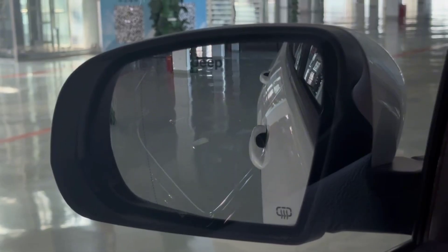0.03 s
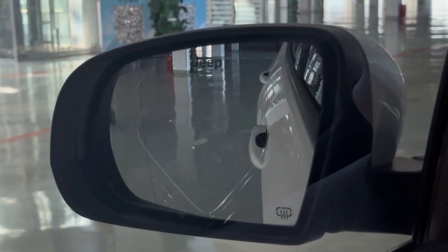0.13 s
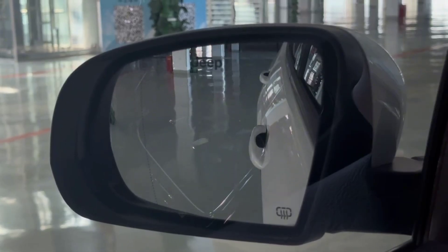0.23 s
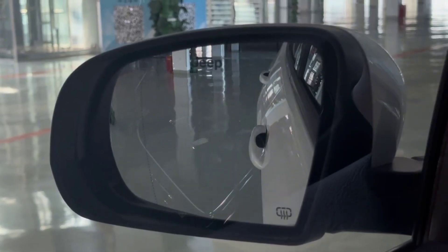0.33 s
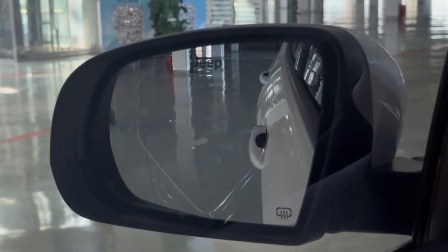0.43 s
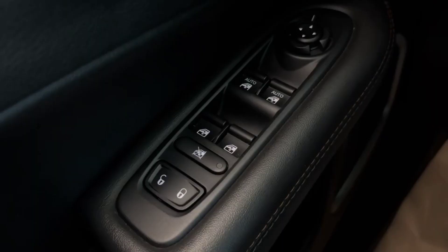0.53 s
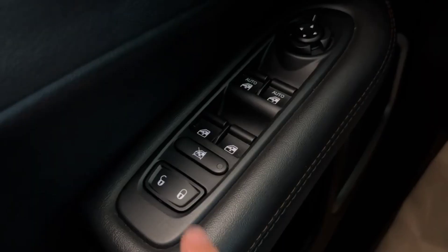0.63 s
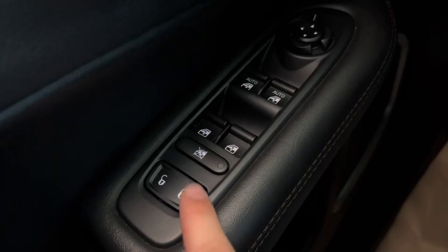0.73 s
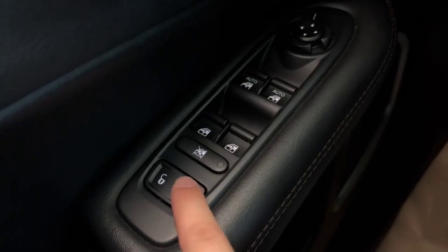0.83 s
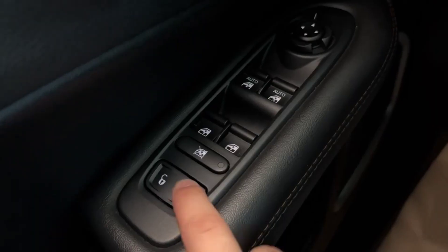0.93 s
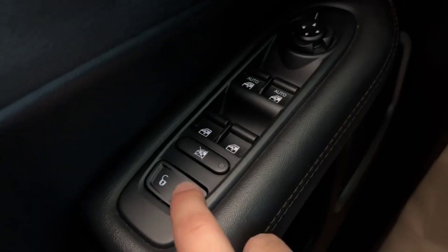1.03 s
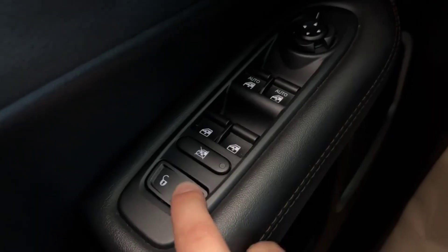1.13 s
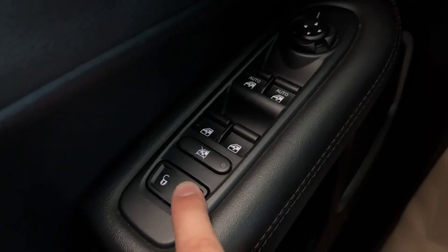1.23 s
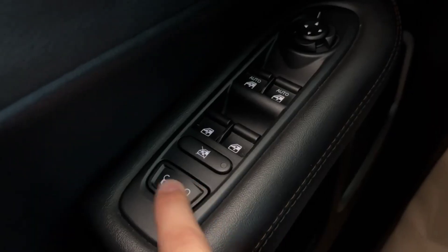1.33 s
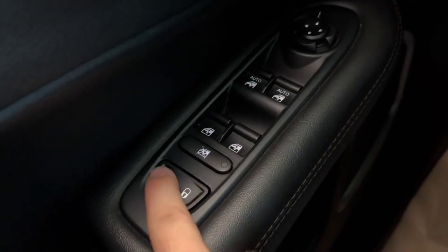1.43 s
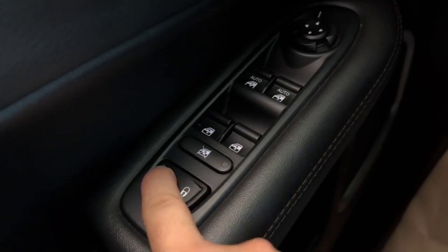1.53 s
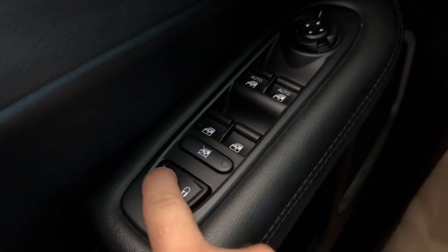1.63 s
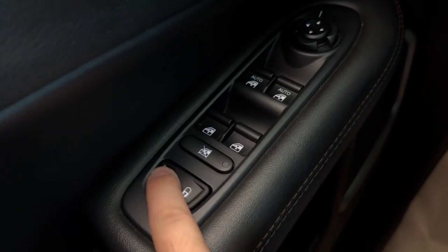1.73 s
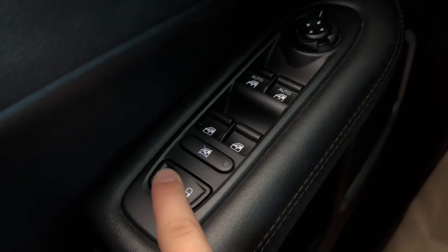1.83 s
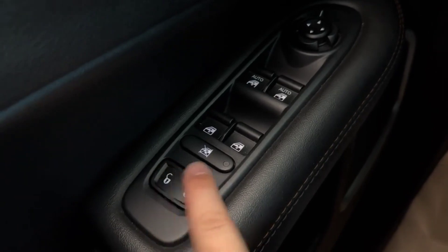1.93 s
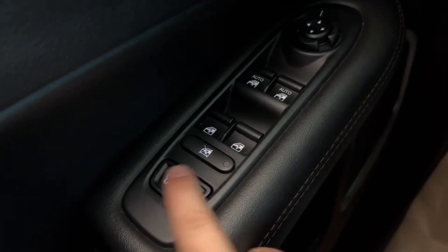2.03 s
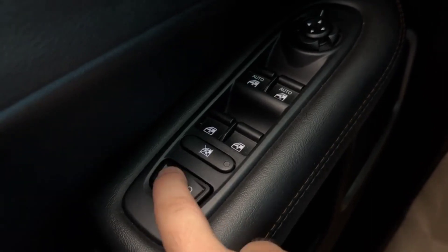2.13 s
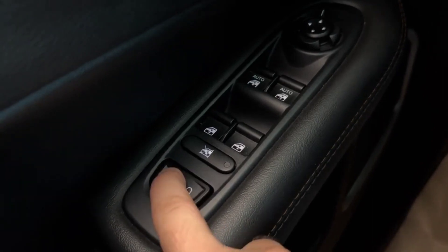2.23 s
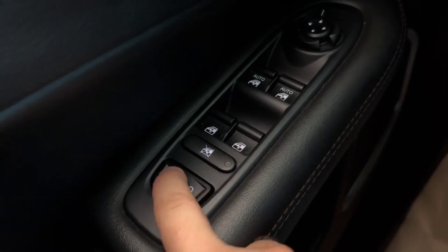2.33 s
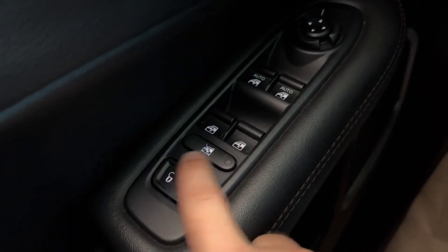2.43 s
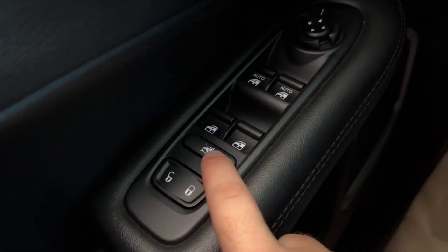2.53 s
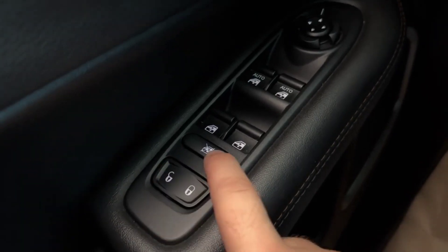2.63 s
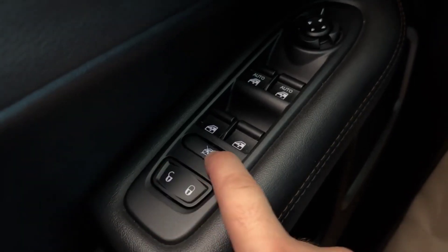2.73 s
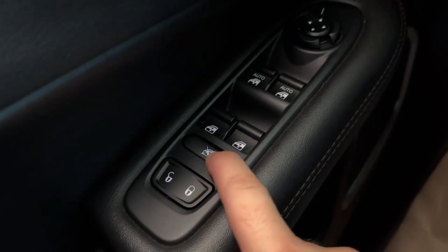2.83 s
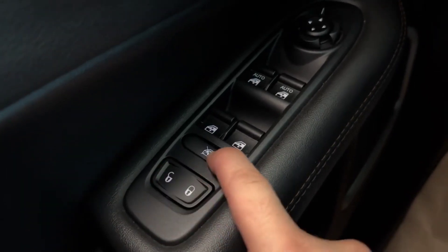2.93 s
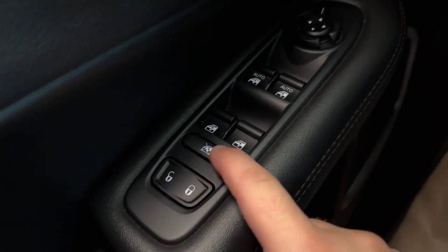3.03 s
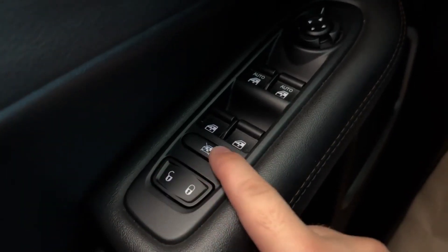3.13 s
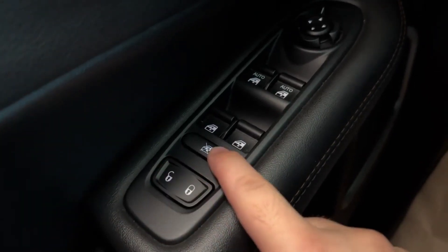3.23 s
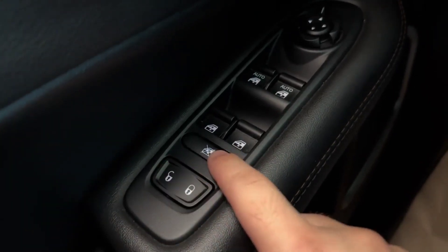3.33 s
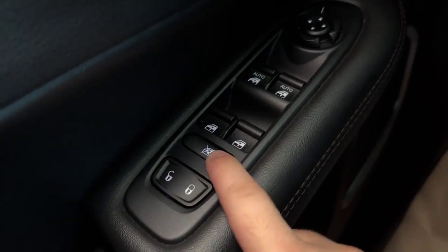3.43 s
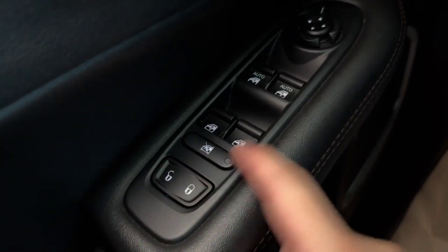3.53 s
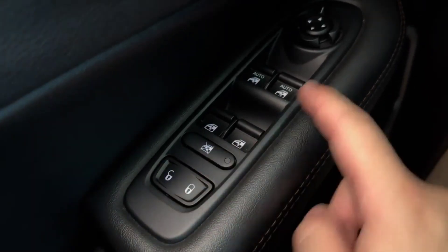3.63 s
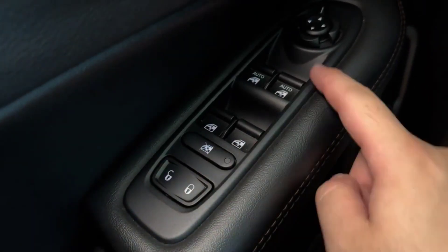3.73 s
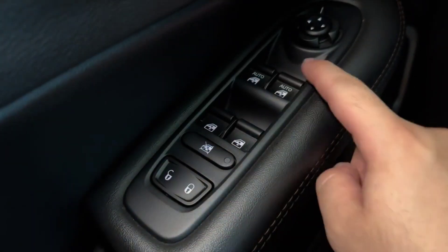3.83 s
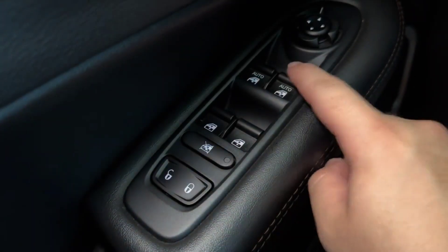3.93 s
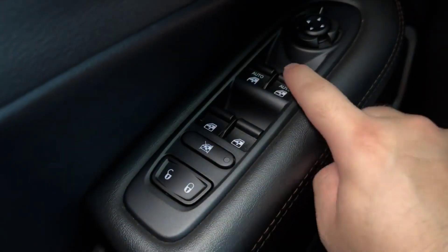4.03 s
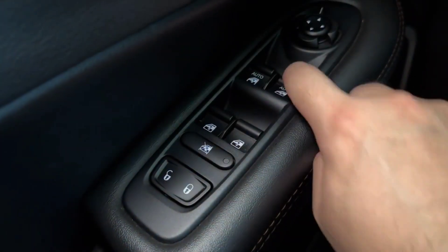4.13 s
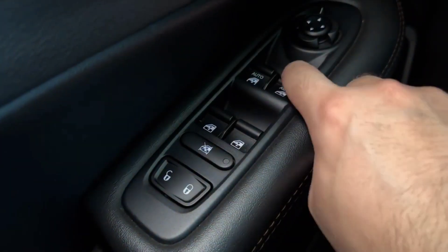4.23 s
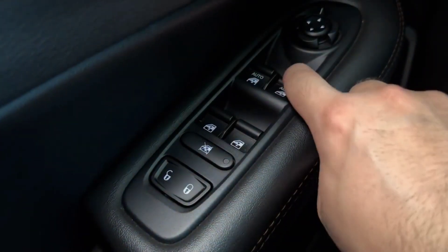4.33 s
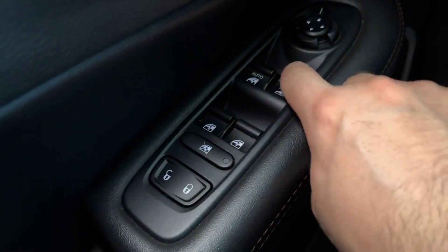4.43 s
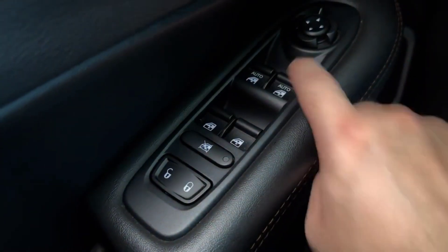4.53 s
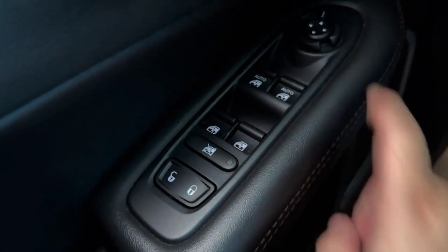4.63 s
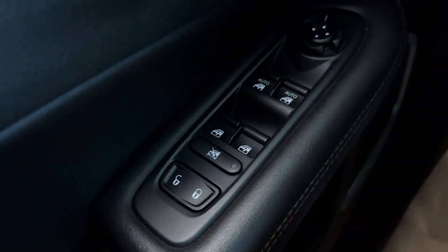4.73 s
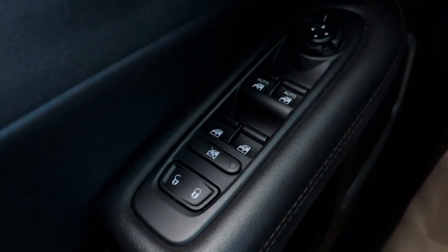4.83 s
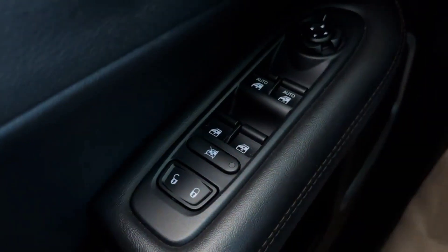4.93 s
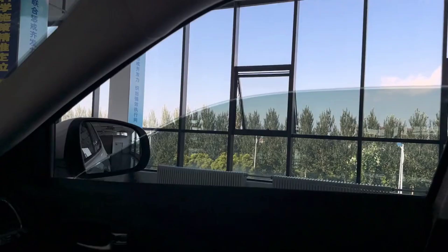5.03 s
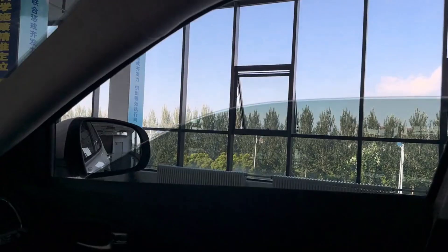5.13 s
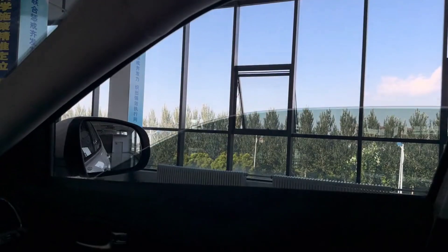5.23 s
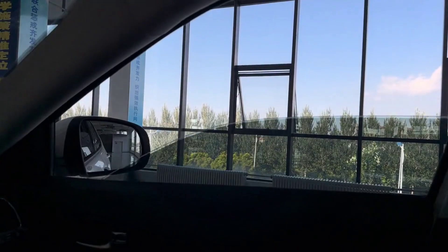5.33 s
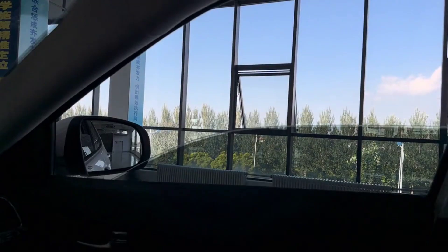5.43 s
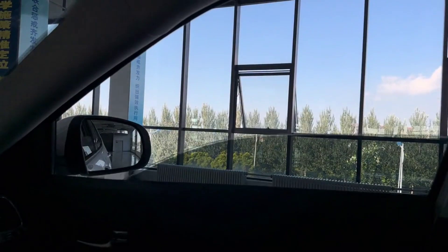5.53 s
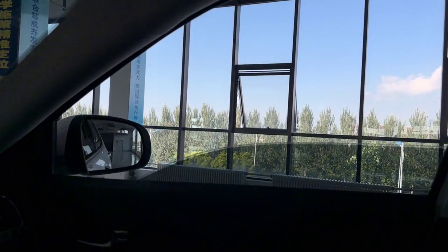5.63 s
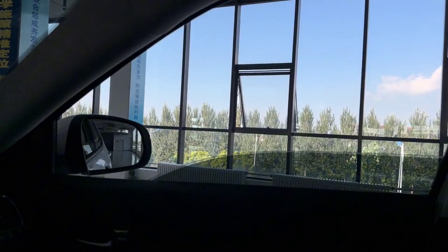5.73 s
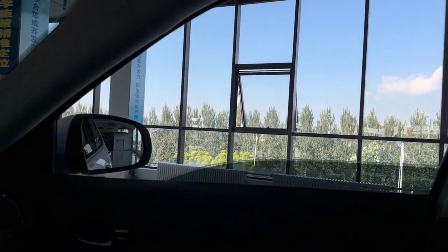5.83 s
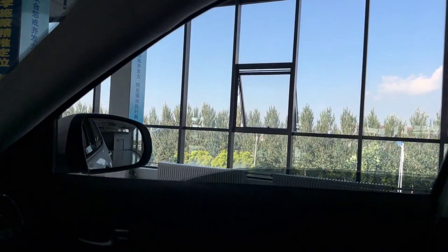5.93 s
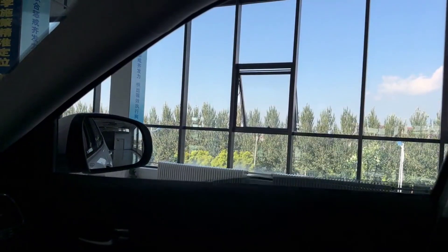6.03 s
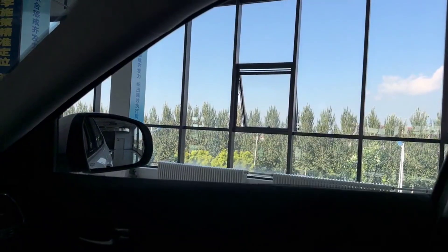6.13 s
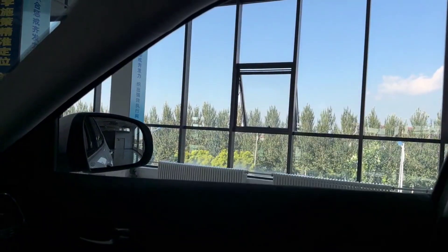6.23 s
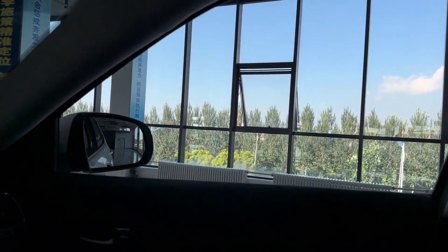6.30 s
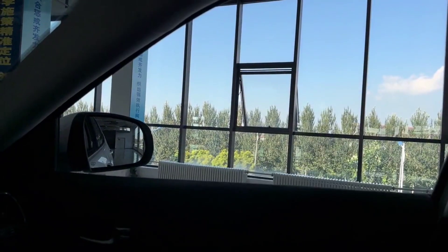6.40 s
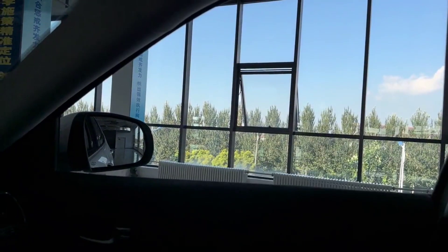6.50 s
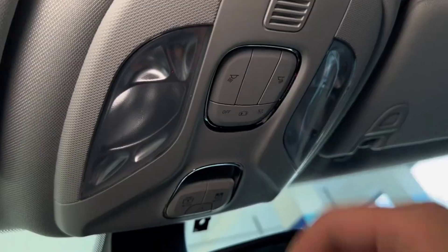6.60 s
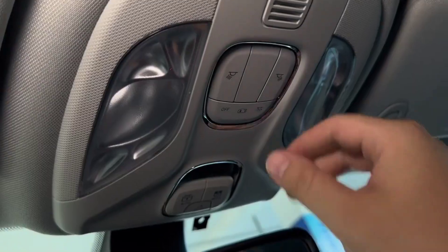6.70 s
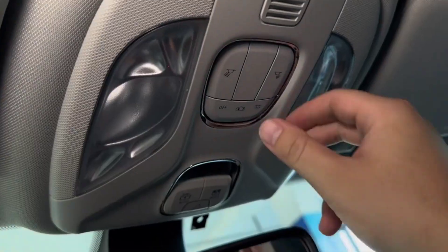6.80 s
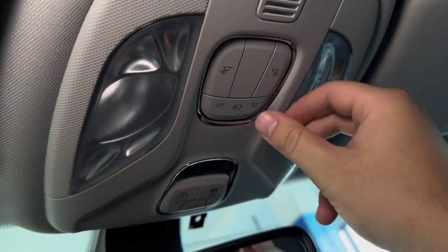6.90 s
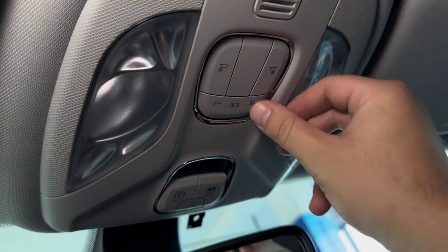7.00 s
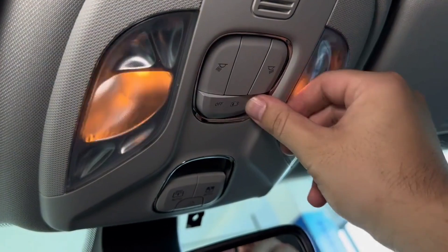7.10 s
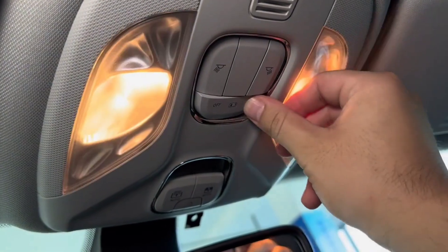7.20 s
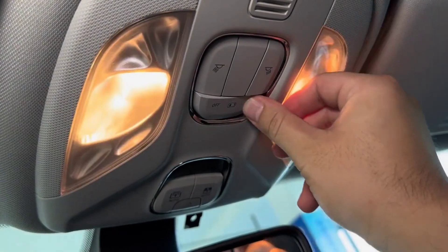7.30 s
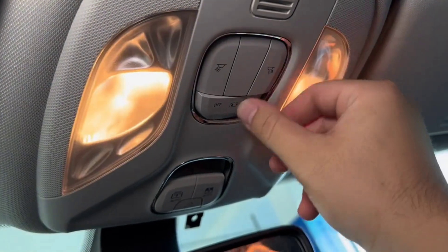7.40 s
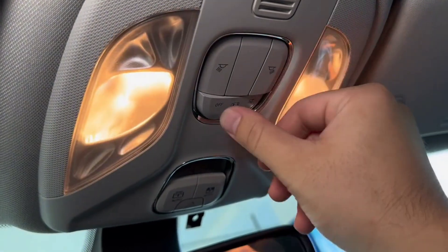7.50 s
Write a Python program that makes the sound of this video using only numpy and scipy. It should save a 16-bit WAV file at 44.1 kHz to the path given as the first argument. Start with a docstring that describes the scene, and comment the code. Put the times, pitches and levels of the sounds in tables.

```python
"""Plastic switches click under a rubbing fingertip inside a parked car, and twice the lock motors whirr
and the door latches slam. A lockout button clicks in and out, a motor lowers a window through its seals
to the end stop, and a roof lamp is clicked on, all over the dull noise of a hall outside.
Each impact is a short crack, the damped modes of the struck part, and a cabin reverberation whose bass
builds late and lingers. The fingertip sounds by stick-slip, the window by shaft harmonics and friction."""
import sys
import numpy as np
from scipy import signal
from scipy.fft import rfft, irfft, next_fast_len
from scipy.io import wavfile
from scipy.ndimage import uniform_filter1d

SR = 44100
rng = np.random.default_rng(int(sys.argv[2]) if len(sys.argv) > 2 else 0)


def wrap_up_sound(samples):
    """Save the sound to the file named by the first command line argument, as 16-bit audio."""
    columns = np.atleast_2d(samples).T
    # keep every value between -1 and 1, then stretch to whole-number steps
    tamed = np.clip(columns, -1, 1)
    steps = np.round(tamed * 32767).astype(np.int16)
    wavfile.write(sys.argv[1], SR, steps)


N = 333396
TIME = np.arange(N) / SR

# Each entry: start of a run of the lock motors in seconds.
LOCK_RUNS = [1.022, 2.205]
# Low, middle and high noise at the window. Each row: frequency in Hz, relative level in dB.
RUMBLE_SPECTRUM = [(30, -21), (55, -2.5), (125, 6), (160, -9), (220, -2.5), (350, -8), (500, -14),
                   (700, -19.5)]
SCRAPE_SPECTRUM = [(350, -9), (550, -12), (900, 3.5), (1200, -3), (1700, -0.5), (2400, -10), (3200, -12)]
HISS_SPECTRUM = [(1800, 4.5), (2700, 6), (3600, 3), (4500, 6.5), (6000, 3.5), (7800, 2.5), (9000, -7.5),
                 (11000, 1), (13000, -14), (15500, -11)]


def latches(thump_db=-20):
    """Impact excitation: the latches of all the doors slam in a cluster, each with the same thump."""
    # Each row: start in seconds, snap in dB, hardness in dB.
    slams = [(1.074, -23, -3.5), (1.078, -19.5, -7), (1.089, -18.5, -9), (1.103, -22.5, 4.5),
             (1.107, -20.5, -17), (1.124, -28, -13.5), (1.136, -26.5, -23), (2.2558, -22.5, 3),
             (2.263, -20.5, 2), (2.2704, -15, -7), (2.284, -25, -9), (2.297, -31, -10), (2.313, -41, -24)]
    # Each row: frequency in Hz, relative level in dB, t60 in seconds.
    door_modes = [(53, 2, .35), (178, 3, .18), (235, -5, .12), (520, 0, .08), (615, -3, .07),
                  (1075, -4, .05), (1400, -2, .045), (1650, -1, .04), (3500, -10, .06), (5400, -9, .07),
                  (6350, -8, .07), (7610, -9, .06)]
    starts, snap_db, hardness_db = np.transpose(slams)
    return impacts(starts, snap_db, thump_db, hardness_db, snap_pitch(hardness_db, 1740), door_modes,
                   boom_db=-9.5, hollow_db=-1.5, trim_hz=456, trim_db=0.5, pan_db=0.5, width=1.1,
                   crack_db=0.5, crack_s=0.006, ping_db=15, ping_s=0.0012, ring=0.91, bloom=0.26)


def switches(relay_lead_s=0.0065):
    """Snap-through: plastic rockers jump between stable positions; a relay ticks before each lock run."""
    # Each row: start in seconds, snap in dB, thump in dB, hardness in dB, snap pitch in Hz.
    clicks = [(0.019, -53, -35.5, 0, 2200), (0.051, -54.5, -37, -12, 1540), (0.808, -58, -40, -18, 990),
              (0.8605, -54.5, -54, -14.5, 2120), (0.933, -48.5, -50, -6.5, 1520),
              (0.9527, -19.5, -28.5, -17.5, 2380), (1.1757, -41.5, -19.5, 4.5, 2300),
              (1.2955, -46.5, -38, -28, 1816), (1.448, -37, -25, -12.5, 1830),
              (1.5139, -27.5, -26, -19, 1860), (1.636, -39.5, -49, -10.5, 1900),
              (1.745, -23.5, -29, -9, 1830), (1.8186, -38, -36, -23, 1820), (2.1192, -44, -43, -22, 960),
              (2.135, -33, -28, -12.5, 1970), (2.36, -39, -41, -4.5, 1430), (2.3781, -32, -24.5, -3, 1836),
              (3.951, -48.5, -36, -26, 1900), (4.031, -55, -62, -15, 2160), (4.053, -44, -27.5, -2, 2454),
              (4.538, -38, -27.5, 0, 3480)]
    # Each row: frequency in Hz, relative level in dB, t60 in seconds.
    switch_modes = [(61.83, 4, 0.057), (184, 2.5, 0.15), (410, 1.5, 0.095), (1850, 18.5, 0.026),
                    (2930, -1, .02), (4000, 0.5, .03), (7530, 4, 0.032), (7990, 1, 0.015),
                    (11800, -2.5, 0.017), (14800, -8.5, .05)]
    relay_ticks = [(start - relay_lead_s, -55, -55, 6, 1500) for start in LOCK_RUNS]
    return impacts(*np.transpose(clicks + relay_ticks), switch_modes,
                   boom_db=-1.5, hollow_db=-3, trim_hz=468, trim_db=8.5, pan_db=-1, width=0.89,
                   crack_db=14.5, crack_s=0.0012, ping_db=29.5, ping_s=0.00053, ring=0.85, bloom=0.95)


def lock_motors(run_s=0.066, level_db=-27, mesh_hz=189.5):
    """Amplitude modulation: the rattle of small gear trains pulses as their teeth mesh."""
    # Each row: frequency in Hz, relative level in dB.
    gear_spectrum = [(47, -40.5), (80, -7), (196, -7), (451, -7.5), (627, -16), (1470, -18.5),
                     (2490, -25.5), (2970, -29), (3780, -37.5), (7950, -45.5), (9470, -53.5),
                     (15000, -62.5)]
    running = sum(gate(start, start + run_s) for start in LOCK_RUNS)
    meshing = 1 + 0.21 * np.sin(2 * np.pi * mesh_hz * TIME)
    return running * undb(level_db) * meshing * noise(gear_spectrum)


def window_motor(start_s=4.28, stop_s=6.16, spin_up_s=0.06, hum_build_s=0.38, run_down_s=0.011):
    """Forced vibration and friction: the shaft hums, ten commutator bars whine, the glass drags in seals."""
    # Each row: multiple of the shaft rate, relative level in dB.
    hum_orders = [(1, 4.5), (2, -14), (3, -18), (4, -33), (5, -24.5)]
    whine_orders = [(2, -0.5), (8, -12.5), (10, 4.5), (14, -14.5), (17, -15), (20, -11.5), (30, -14)]
    # The window is heard first from over the armrest, then facing the glass.
    # Each row: start in seconds, then the levels of hum, whine, rumble, scrape and hiss in dB.
    positions = [(4.2, -32, -63.5, -45, -61, -49), (5.066, -43, -51, -46.5, -54, -44.5)]
    since, *levels_db = np.transpose(positions)
    position = np.maximum(np.searchsorted(since, TIME) - 1, 0)
    hum, whine, rumble, scrape, hiss = uniform_filter1d(undb(levels_db)[:, position], size=256, axis=1)
    age = np.maximum(TIME - start_s, 0)
    running = (age > 0) * np.exp(-np.maximum(TIME - stop_s, 0) / run_down_s)
    wobble_hz = 0.45 * np.cos(2 * np.pi * age / 0.41)  # once per turn of the cable drum
    shaft_hz = 92.4 + 3.7 * age + wobble_hz  # speeds up as the load eases
    shaft_hz *= 1 - 0.2 * np.exp(-age / spin_up_s)
    angle = 2 * np.pi * np.cumsum(shaft_hz * (1 + 0.000753 * drift(25.7))) / SR
    stereo_angle = angle + np.array([[0.03], [-0.03]])
    tones = np.zeros((2, N))
    for orders, gain in ((hum_orders, hum * (1 - np.exp(-age / hum_build_s))), (whine_orders, whine)):
        for order, db in orders:
            waver_db = (0.8 if order in (1, 10) else 2.2) * drift(16)
            tones += gain * undb(db + waver_db) * np.sin(order * stereo_angle)
    breakaway = undb(9) * np.exp(-age / 0.035)
    grip = undb(-7.5 * age) + breakaway  # less and less glass is left in the seals
    drag = undb(0.62 * drift(26)) * (1 + 0.13 * np.sin(angle))  # the worm gear pushes once a turn
    door_rumble = noise(RUMBLE_SPECTRUM) * rumble
    friction = noise(SCRAPE_SPECTRUM) * scrape + noise(HISS_SPECTRUM) * hiss * grip
    return running * (tones + door_rumble + drag * friction)


def glass_knocks(full_knock_db=-23, boom_loss=0.6):
    """Low door modes ring as the hand meets the switch and the pane breaks free and reaches its stop."""
    # Each row: start in seconds, snap in dB, thump in dB, hardness in dB.
    knocks = [(4.157, -53.5, -48, -18), (4.174, -46, -27.5, -21), (4.205, -43.5, -20.5, -21),
              (4.215, -41.5, -24.5, -3), (4.272, -39.5, -19.5, -31), (4.279, -36.5, -23.5, -13),
              (4.315, -62, -28.5, -2), (6.156, -48, -30.5, -18), (6.195, -51.5, -35.5, -30),
              (6.245, -72, -42, -13.5), (6.293, -57.5, -48.5, -19)]
    # Each row: frequency in Hz, relative level in dB, t60 in seconds.
    glass_modes = [(51.3, 6, 0.67), (100.7, 2, 0.52), (173, 3, 0.12), (212.6, 3, 0.14), (471, 7.5, 0.056),
                   (626, -6, 0.02), (1115, -14, 0.12)]
    starts, snap_db, thump_db, hardness_db = np.transpose(knocks)
    boom_db = 5 - boom_loss * np.maximum(full_knock_db - thump_db, 0)  # light knocks boom less
    return impacts(starts, snap_db, thump_db, hardness_db, snap_pitch(hardness_db, 1900), glass_modes,
                   boom_db=boom_db, hollow_db=8.5, trim_hz=488, trim_db=4.5, pan_db=-0.5, width=0.86,
                   crack_db=-26, crack_s=0.0014, ping_db=11, ping_s=0.0013, ring=1.0, bloom=0.31)


def lockout_button():
    """Contact chatter: the button's catch strikes repeatedly as it engages and springs back."""
    # Each row: start in seconds, snap in dB, hardness in dB.
    clicks = [(2.524, -55, -25), (2.553, -56.5, -25), (2.598, -41.5, -14), (2.64, -53, -26),
              (2.694, -48.5, -19), (2.7359, -42.5, 7), (2.9831, -36, 1), (3.0066, -33, -10.5),
              (3.0313, -37.5, -14), (3.2457, -34.5, -15.5), (3.268, -43.5, -23), (3.321, -41.5, -15),
              (3.335, -39, -26), (3.349, -47.5, 4.5), (3.4832, -43, -3.5), (3.508, -32, -6),
              (3.527, -34, -13.5)]
    # Each row: frequency in Hz, relative level in dB, t60 in seconds.
    button_modes = [(51.6, -26, 0.26), (170.5, -10, 0.21), (470, -6, 0.03), (912, -1.5, 0.16),
                    (1020, -6.5, 0.17), (1104, -10, 0.16), (1395, 0, 0.075), (1850, -20, 0.31),
                    (2638, -12, 0.15), (2840, -26, 0.14), (3950, -6, 0.097)]
    starts, snap_db, hardness_db = np.transpose(clicks)
    thump_db = -22 + 0.25 * snap_db  # the finger pushes with nearly the same weight
    return impacts(starts, snap_db, thump_db, hardness_db, snap_pitch(hardness_db, 2220), button_modes,
                   boom_db=-2.5, hollow_db=-1.5, trim_hz=441, trim_db=-2, pan_db=-1, width=0.84,
                   crack_db=6, crack_s=0.0026, ping_db=23.5, ping_s=0.00048, ring=0.89, bloom=0.55)


def roof_lamp():
    """Panel radiation: the lamp's lens clicks in and the roof lining booms like a soundboard."""
    # Each row: start in seconds, snap in dB, thump in dB, hardness in dB.
    clicks = [(6.768, -56.5, -53, -13.5), (7.024, -51, -41, -15), (7.039, -33.5, -30.5, -8.5),
              (7.048, -47, -38, -10), (7.08, -58, -42, -18), (7.1036, -50.5, -45.5, 0),
              (7.341, -57, -50, -17)]
    # Each row: frequency in Hz, relative level in dB, t60 in seconds.
    lamp_modes = [(44.1, 18, 0.35), (162, 2, 0.13), (297.7, 3, 0.2), (433, 0, 0.08), (749, -3.5, 0.063),
                  (1095, 1, 0.081), (1345, 4, 0.083), (1720, -7, .06), (3135, -2, .06), (6130, 2, 0.04)]
    starts, snap_db, thump_db, hardness_db = np.transpose(clicks)
    return impacts(starts, snap_db, thump_db, hardness_db, snap_pitch(hardness_db, 2200), lamp_modes,
                   boom_db=13, hollow_db=-0.5, trim_hz=492, trim_db=3, pan_db=-1.5, width=0.75,
                   crack_db=8.5, crack_s=0.0019, ping_db=11.5, ping_s=0.00088, ring=1.05, bloom=0.77)


def finger_rubs(tick_db=-17.5, fade_db_per_s=37, release_s=0.017, scatter_db=9):
    """Stick-slip friction: a fingertip grips and lets go; each slip ticks and rings the plastic panel."""
    # Each row: start, end and attack in seconds, first and last slip rate in Hz, level in dB,
    # unevenness from 0 to 1.
    strokes = [(1.368, 1.465, 0.026, 154, 148, -21.5, 0.04), (3.77, 3.826, 0.0052, 160, 170, -26.5, .2),
               (3.813, 3.964, 0.0068, 108, 77.3, -30.5, .22)]
    # Each row: frequency in Hz, bandwidth in Hz, relative level in dB.
    panel_modes = [(109.5, 12.5, 8), (166.5, 43, 1.5), (290, 47, -17), (427, 20, -4.5)]
    # Each row: frequency in Hz, relative level in dB.
    tick_spectrum = [(500, 6), (900, 13), (1400, 11.5), (1950, 4), (2700, -2), (5000, -4.5), (8000, -28),
                     (15000, -41)]
    t = np.arange(SR // 8) / SR
    panel = sum(undb(db) * bandwidth * np.exp(-np.pi * bandwidth * t) * np.sin(2 * np.pi * hz * t)
                for hz, bandwidth, db in panel_modes)
    panel /= np.sqrt(np.sum(panel ** 2))
    tick = noise(tick_spectrum)[:, :len(t)] * (np.exp(-t / 0.00076) + 0.41 * np.exp(-t / 0.0091))
    tick *= np.sin(np.pi / 2 * np.minimum(t / 0.0006, 1)) ** 2  # soft skin lets go gradually
    tick /= np.sqrt(np.sum(tick ** 2, axis=1, keepdims=True))
    out = np.zeros((2, N))
    for start, end, attack_s, first_hz, last_hz, db, uneven in strokes:
        age = np.clip(TIME - start, 0, end - start)
        slip_hz = first_hz * (last_hz / first_hz) ** (age / (end - start))
        contact = np.minimum(age / attack_s, 1) * np.clip((end - TIME) / release_s, 0, 1)
        grip = contact * undb(db - fade_db_per_s * age)
        slip_count = np.floor(np.cumsum(slip_hz * np.maximum(1 + uneven * drift(90), 0.1)) / SR)
        slip_size = grip * undb(scatter_db * uneven * drift(110)) * np.sqrt(SR / slip_hz)
        slips = np.diff(slip_count, prepend=0) * slip_size
        out += signal.oaconvolve(slips, panel)[:N]
        out += signal.oaconvolve([slips * undb(tick_db + 3 * drift(130))], tick, axes=1)[:, :N]
    return out


def finger_slides():
    """Sliding friction: skin hisses softly over the plastic between presses."""
    # Each row: start and end in seconds, level in dB.
    slides = [(1.29, 1.404, -60.5), (1.375, 1.48, -51.5), (1.819, 1.975, -60), (1.99, 2.099, -57),
              (2.62, 2.8, -64.5), (3.713, 3.957, -63.5), (6.568, 6.711, -67.5)]
    # Each row: frequency in Hz, relative level in dB.
    skin_spectrum = [(500, 9), (1500, -1), (2500, 6), (4000, -2.5), (7500, -4.5), (11000, -1),
                     (15000, -6.5)]
    contact = sum(gate(start, end, fade_s=0.029) * undb(db) for start, end, db in slides)
    return noise(skin_spectrum) * undb(2 * drift(49)) * contact


def cabin_noise(air_db=-59.5):
    """Transmission loss: the car body dulls the hall's noise; the rumble swells as a hand works the door."""
    # Each row: frequency in Hz, relative level in dB.
    air_spectrum = [(15, -45), (25, -22), (43, -9), (64, -10), (103, -7), (115, -17), (219, -25),
                    (450, -34), (488, -27.5), (637, -47), (1060, -42), (1670, -47.5), (15000, -60.5)]
    # Each row: start and end in seconds, level in dB.
    handling = [(-0.1, 0.38, -50), (0.2, 4.2, -56), (1.0, 1.74, -49), (2.3, 3.01, -49), (4.12, 4.74, -35)]
    handling_power = sum((gate(start, end, fade_s=0.23) * undb(db)) ** 2 for start, end, db in handling)
    return noise(air_spectrum) * np.sqrt(undb(air_db) ** 2 + handling_power) * undb(1.2 * drift(6))


def open_window(start_s=6.17, end_s=6.585):
    """Transmission through an aperture: for a moment the hall sounds brighter through the open window."""
    # The entries: low, middle and high noise level in dB.
    levels_db = (-54.5, -60.5, -81)
    spectra = RUMBLE_SPECTRUM, SCRAPE_SPECTRUM, HISS_SPECTRUM
    hall = sum(noise(spectrum) * undb(db) for spectrum, db in zip(spectra, levels_db))
    return gate(start_s, end_s, fade_s=0.025) * hall


def whistles(waver=0.012):
    """Random modulation: faint pure tones waver in pitch and level."""
    # Each row: start and end in seconds, frequency in Hz, level in dB.
    tones = [(.6, 4.2, 1087, -84), (6.58, 7.56, 1464, -84)]
    out = np.zeros(N)
    for start, end, hz, db in tones:
        phase = 2 * np.pi * np.cumsum(hz * (1 + waver * drift(120))) / SR
        out += gate(start, end) * undb(db + 2 * drift(28)) * np.sin(phase)
    return out


def impacts(starts, snap_db, thump_db, hardness_db, snap_hz, modes, boom_db, hollow_db, trim_hz, trim_db,
            pan_db, width, crack_db, crack_s, ping_db, ping_s, ring, bloom):
    """Impulse response: a crack, damped modes and a diffuse tail. Ring scales its decay, bloom its rise."""
    # The cabin's five bands. Each row: lower and upper edge in Hz, rise and t60 in seconds, side share.
    bands = [(46, 123.5, 0.016, 0.38, .08), (111.1, 310, 0.0097, .17, 0.34), (324, 760, 0.0047, .075, 0.93),
             (870.4, 3300, 0.0027, 0.099, 0.93), (3520, 13000, .0006, 0.093, 1.0)]
    t = np.arange(SR // 3) / SR
    starts, snap_db, thump_db, hardness_db, snap_hz = np.broadcast_arrays(
        starts, snap_db, thump_db, hardness_db, snap_hz)
    # The thump drives the bass, the snap the middle; hardness trades hollow trim for treble tick.
    band_db = [thump_db + boom_db, thump_db, snap_db + hollow_db - 0.14 * hardness_db,
               snap_db, snap_db + hardness_db]
    scatter = rng.standard_normal((len(starts), 2))
    sounds = np.zeros((2, len(starts), len(t)))  # mid and side, impact, sample
    for k, (low_hz, high_hz, rise_s, t60, side_share) in enumerate(bands):
        age = t if k < 2 else t[:len(t) * 3 // 4]
        swell = 1 - np.exp(-age / (rise_s * bloom))
        envelope = swell * 1000 ** (-age / (t60 * ring))
        if k > 2:  # only the treble carries the direct crack
            envelope += undb(crack_db) * np.exp(-age / crack_s) * (1 - np.exp(-age / 0.00052))
        white = rng.standard_normal((len(starts), 2, len(age))).transpose(1, 0, 2)
        bandpass = signal.butter(3, [low_hz, high_hz], "band", fs=SR, output="sos")
        part = signal.sosfilt(bandpass, white * envelope) * np.sqrt(SR / 2 / (high_hz - low_hz))
        for hz, db, mode_t60 in modes:
            home_band = sum(hz >= higher[0] for higher in bands[1:])
            if k == home_band:
                detune = 1 + 0.008 * rng.standard_normal((len(starts), 1))  # each blow lands elsewhere
                part += undb(db) * swell * 1000 ** (-age / mode_t60) * ringing(hz * detune, age)
        if k == 2:  # the hollow trim behind the part
            part += undb(trim_db) * envelope * ringing(trim_hz * (1 + 0.06 * scatter[:, :1]), age)
        if k == 3:  # the part itself pings, damped within a few cycles
            part += undb(ping_db) * (age / ping_s) * np.exp(-age / ping_s) * ringing(snap_hz[:, None], age)
        part /= np.sqrt(np.sum(part ** 2, axis=-1, keepdims=True) / (SR / 100))  # energy of 10 ms at rms 1
        part[1] *= side_share * width
        sounds[:, :, :len(age)] += part * undb(band_db[k][:, None])
    out = np.zeros((2, N))
    for start, pan, mid, side in zip(starts, pan_db + 0.75 * scatter[:, 1], *sounds):
        stereo = np.array([mid + side, mid - side]) * undb([[pan / 2], [-pan / 2]])
        first = int(start * SR)
        out[:, first:first + len(t)] += stereo[:, :N - first]
    return out


def snap_pitch(hardness_db, hz, db_per_octave=24):
    """Contact time sets pitch: a harder contact is shorter and snaps higher."""
    return hz * 2 ** (hardness_db / db_per_octave)


def ringing(hz, t):
    """Phase difference: a tone with mid and side in quadrature reaches the right channel first."""
    phase = 2 * np.pi * hz * t
    return np.array([np.sin(phase), -np.cos(phase)])


def noise(spectrum, wide_hz=1700):
    """Spectral shaping: stereo noise of rms 1, coherent in the bass and independent in the treble."""
    size = next_fast_len(N)
    hz = np.arange(size // 2 + 1) * SR / size + 1e-3
    knots_hz, db = np.transpose(spectrum)
    gain = undb(np.interp(np.log(hz), np.log(knots_hz), db))
    gain *= np.minimum(hz / knots_hz[0], 1) ** 2 * np.minimum(knots_hz[-1] / hz, 1) ** 3
    mid, side = rfft(rng.standard_normal((2, N)), size) * gain
    width = np.minimum(hz / wide_hz, 1)
    channels = np.array([mid + width * side, mid - width * side]) / np.sqrt(1 + width ** 2)
    stereo = irfft(channels, size)[:, :N]
    return stereo / np.sqrt(np.mean(stereo ** 2))


def drift(rate_hz):
    """Slow random fluctuation with a spread near 1."""
    knots = rng.standard_normal(4096)
    return 1.6 * np.interp(TIME * rate_hz, np.arange(len(knots)), knots)


def gate(start, end, fade_s=0.0069):
    """An envelope that is on between two times, with linear fades."""
    return np.clip((TIME - start) / fade_s, 0, 1) * np.clip((end - TIME) / fade_s, 0, 1)


def undb(db):
    """Decibels to amplitude ratio."""
    return 10 ** (np.asarray(db) / 20)


def scene():
    """Superposition: switches, locks, finger, window and lamp add to the quiet background."""
    return (switches() + lock_motors() + latches() + lockout_button() + finger_slides() + finger_rubs()
            + glass_knocks() + window_motor() + roof_lamp() + cabin_noise() + open_window() + whistles())


def record(dry, cutoff_hz=16200):
    """Frequency response: the microphone's treble is uneven, and a steep low-pass cuts the top."""
    # Each row: frequency in Hz, gain in dB.
    response = [(20, -1.5), (4000, -3.5), (7800, -0.5), (9200, -12), (10800, -2), (13300, -11),
                (15000, 8.5), (16200, -7.5)]
    hz, db = np.transpose(response)
    grid_hz = np.linspace(0, SR / 2, 257)
    taps = signal.firwin2(65, grid_hz, undb(np.interp(grid_hz, hz, db)), fs=SR)
    heard = signal.oaconvolve(dry, [taps], mode="same", axes=1)
    return signal.sosfilt(signal.ellip(8, 0.2, 70, cutoff_hz, fs=SR, output="sos"), heard)


dry = scene()
out = record(dry)
wrap_up_sound(out)
```